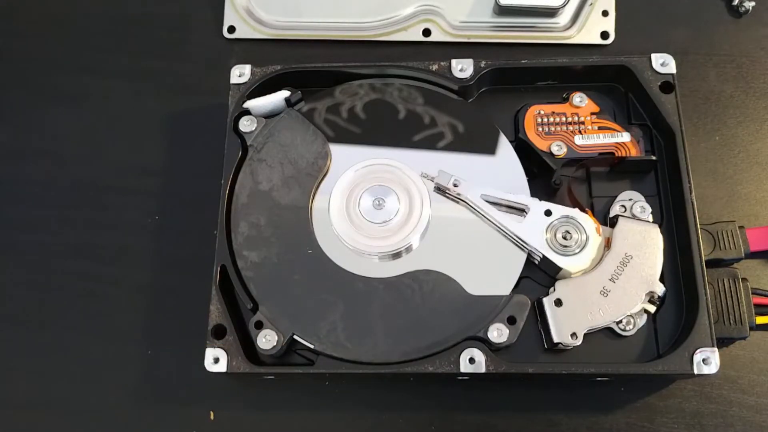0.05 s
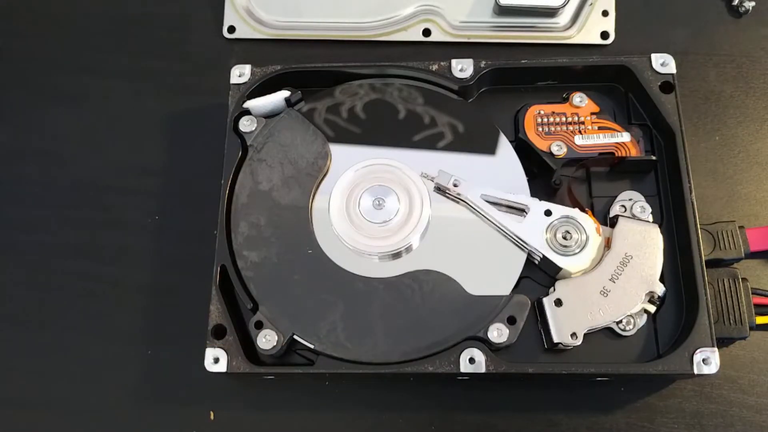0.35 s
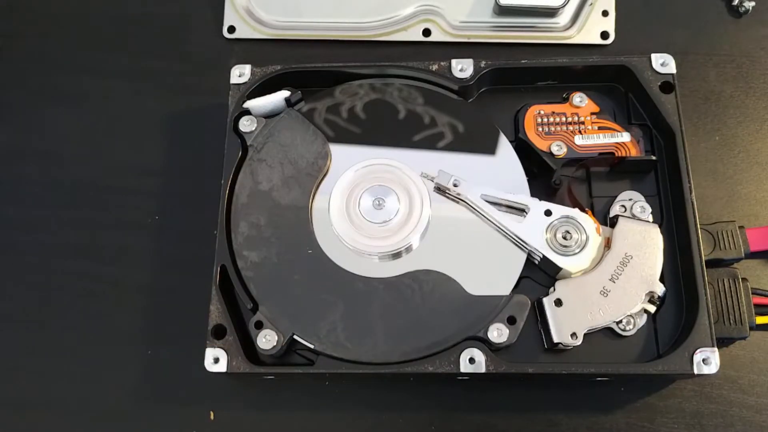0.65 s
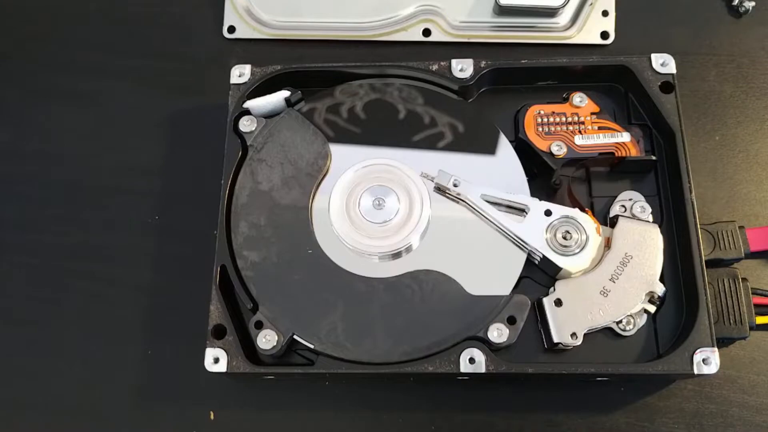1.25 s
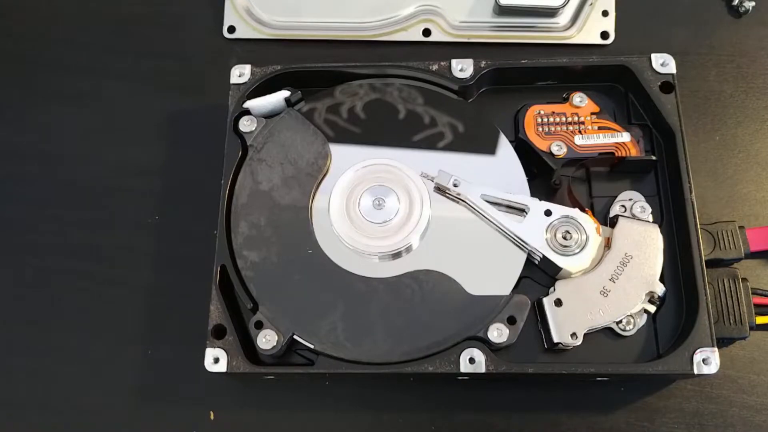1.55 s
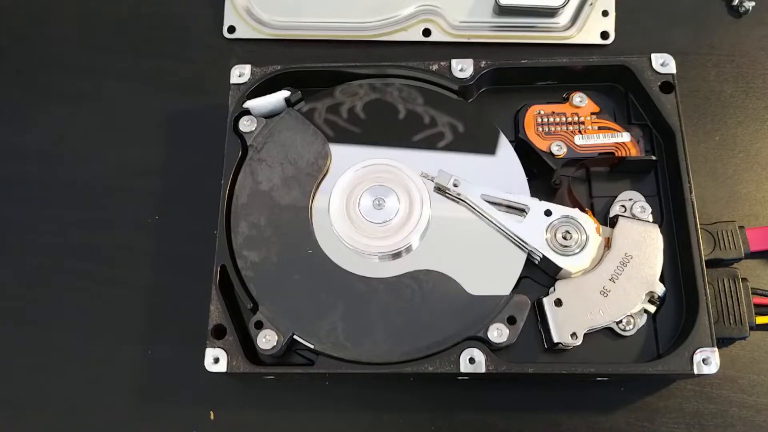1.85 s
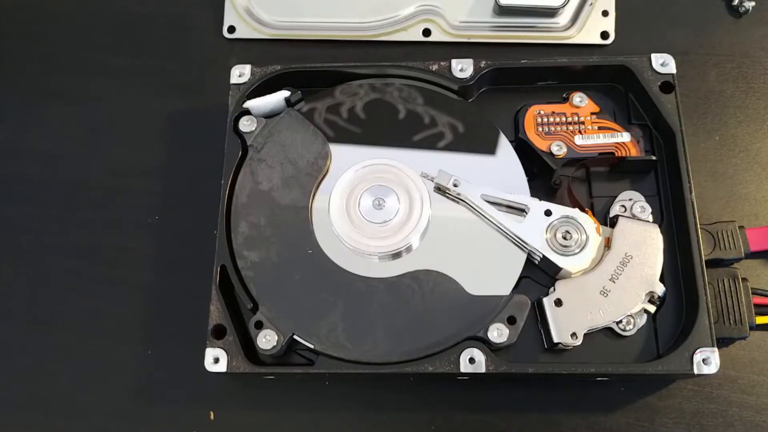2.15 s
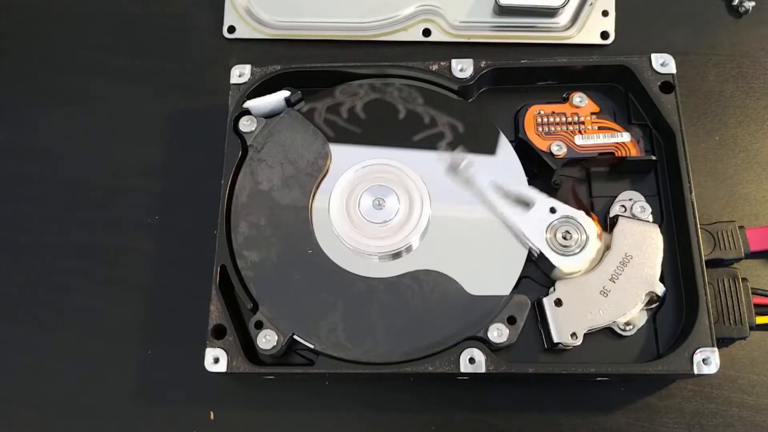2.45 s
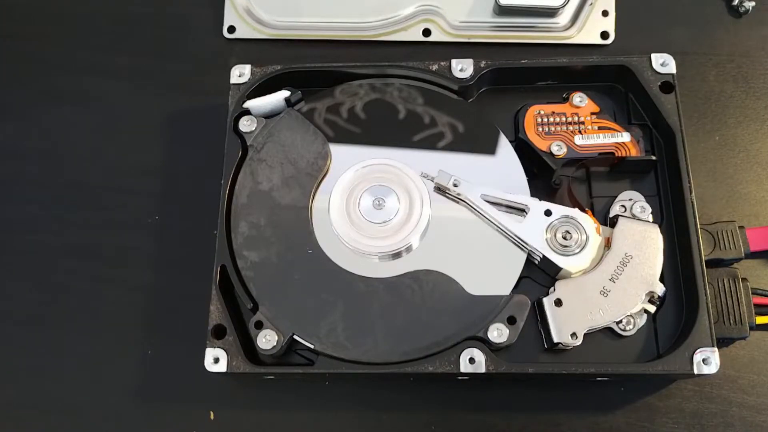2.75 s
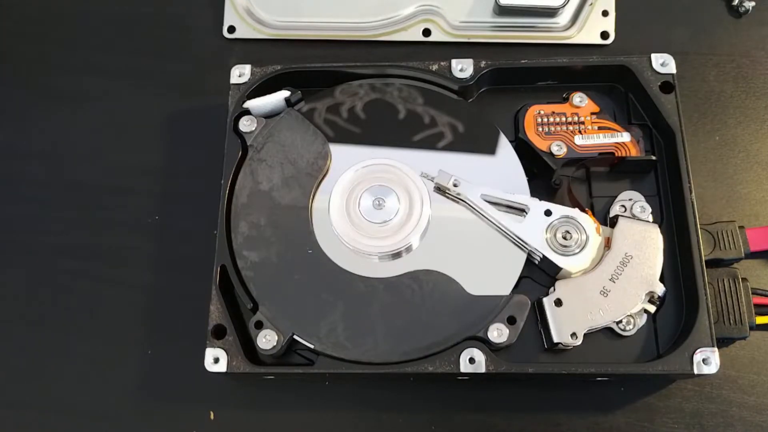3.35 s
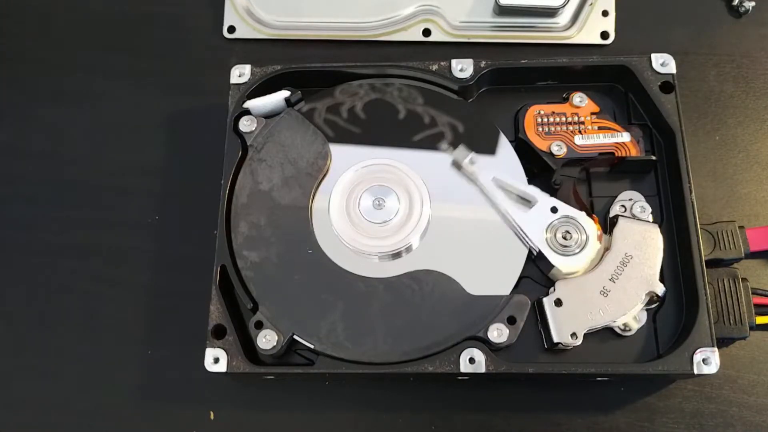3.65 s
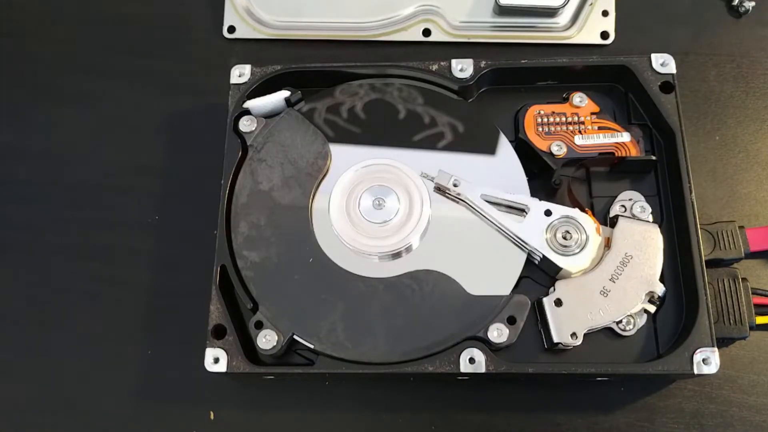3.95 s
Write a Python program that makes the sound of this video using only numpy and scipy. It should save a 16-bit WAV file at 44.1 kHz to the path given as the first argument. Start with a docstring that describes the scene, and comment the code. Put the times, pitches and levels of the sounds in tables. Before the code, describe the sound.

Close up in a small room, an open hard drive's arm makes bright, evenly spaced clicks, each trailed by a soft case thud, then a quick, loud squeak. The spinning platter whirs and hums underneath throughout.

```python
"""Sharp, regular clicks over a steady whir: an open hard disk drive, close up on a desk.
About every 0.64 s the head arm swings out and brakes with a bright tick and a knock, mostly followed
by a settling chirp or two; its return shakes the case with a soft thud. Near the end two fast sweeps
climb through the arm's resonances into a loud squeak. Underneath, the platter drags air, the spindle
hums and rumbles, and a small room adds a short tail."""
import sys
import numpy as np
from scipy import signal
from scipy.fft import rfft, irfft
from scipy.io import wavfile

SR = 44100
rng = np.random.default_rng(int(sys.argv[2]) if len(sys.argv) > 2 else 0)


def pcm_store(signal):
    """Save signal as 16-bit PCM."""
    levels = np.round(np.clip(np.atleast_2d(signal), -1, 1) * 32767)
    wavfile.write(sys.argv[1], SR, levels.astype(np.int16).T)


N = 176400
TIME, FREQ = np.arange(N) / SR, np.fft.rfftfreq(N, 1 / SR)
AROUND = np.arange(-SR // 50, SR // 20) / SR  # seconds before and after an event's peak
BAND_LIMIT_HZ = 16000

# each braking of the arm: time_s, gain_db
BRAKES = [(.5102, 0.5), (1.1510, 0), (1.7917, 0.5), (2.4323, 0.5), (2.9567, 0), (3.5971, .5)]


def knocks():
    """The force of each braking: a few hard cycles and a dying rattle."""
    force = np.zeros(N)
    pitch_hz, rise_s, delay_s = 1624, 0.00098, 0.0026
    for s, db in BRAKES:
        blow = amp(-9) * swell(rise_s, fall_s=0.00055) * buzz(pitch_hz, tilt=1, grit=0.46)
        rattle = amp(-17.5) * swell(rise_s, fall_s=0.0092) * rng.standard_normal(len(AROUND))
        add(force, s + delay_s, amp(db) * (blow + rattle))
    return force


def ticks():
    """The arm's light tip, to the left: a tick and airy snap before each knock, then thin pings."""
    # pings as the arm stops or swings back: time_s, level_db
    pings = [(0.0688, -37), (.5635, -39), (1.214, -35.5), (1.838, -37), (2.520, -36), (3.02, -30),
             (3.7565, -31), (3.8335, -36)]
    force, air = np.zeros(N), np.zeros(N)
    rise_s = 0.00023
    for s, db in BRAKES:
        add(force, s, amp(db - 15) * swell(rise_s, fall_s=0.00047) * buzz(hz=6370, tilt=4, grit=0.9))
        add(air, s, amp(db - 31) * swell(rise_s, fall_s=0.00068) * noise_band(hz=14700, width_hz=1500))
    for s, db in pings:
        add(air, s, amp(db) * swell(rise_s, fall_s=0.0012) * noise_band(hz=11600, width_hz=2400))
    return pan(arm_ring(force), left_db=5.5) + pan(air, left_db=10.5)


def chirps():
    """The force of the arm shuddering as it settles: pitch and level rise and fall together."""
    # settling shudders: time_s, level_db, peak_pitch_hz, rise_s
    shudders = [(.002, -29, 1720, .002), (0.5312, -12, 1770, 0.0029), (1.1673, -16, 1790, 0.0027),
                (1.1823, -14, 1776, .002), (1.8063, -15.5, 1779, 0.0021), (1.8135, -47, 1810, 0.0017),
                (2.977, -13.5, 1793, 0.0026), (3.6133, -15.5, 1780, 0.0021), (3.665, -15.5, 1780, 0.0016)]
    bend_depth, bend_s = 0.1232, 0.0042
    arch = 1 - bend_depth * (1 - np.exp(-(AROUND / bend_s) ** 2))
    force = np.zeros(N)
    for s, db, hz, rise_s in shudders:
        add(force, s, amp(db) * swell(rise_s, fall_s=0.0012) * buzz(hz * arch, tilt=0.88, grit=0.32))
    return force


def sweeps():
    """The force of two fast arm sweeps: a tone gliding up and down over dark, scraping grit."""
    # the path of both sweeps: time_s, pitch_hz, level_db
    glide = [(3.710, 1300, -31), (3.7155, 1622, -14.5), (3.7195, 3235, -26), (3.7215, 4426, -9),
             (3.724, 6005, -18), (3.7275, 4468, -10), (3.7305, 3252, -12.5), (3.735, 1712, -31),
             (3.7425, 1936, -18), (3.745, 3130, -15.5), (3.7472, 4454, -9.5), (3.7488, 5580, -5.5),
             (3.7515, 5570, -11.5), (3.7545, 4706, -11.5), (3.7565, 3080, -11.5), (3.760, 2660, -39),
             (3.767, 1890, -39)]
    s, hz, db = np.transpose(sorted(glide))
    scrape = amp(-9) * unit_rms(cut(rng.standard_normal(N), hz=3500, order=1))
    tone = buzz(np.interp(TIME, s, hz), tilt=1.9, grit=0)
    envelope = amp(np.interp(TIME, s, db)) * (TIME > s[0]) * (TIME < s[-1])
    return envelope * (tone + scrape)


def arm_ring(force):
    """A force rings the arm and chassis; the narrower a resonance, the longer it lasts."""
    # arm and chassis resonances: pitch_hz, width_hz, gain_db
    modes = [(996, 20, -3.5), (1519, 35, -0.5), (1703, 27, -10.5), (1821, 53, 2.5), (2004, 58, 0),
             (2156, 100, -7.5), (2943, 99, -1.5), (3200, 168, 3.5), (3760, 120, -12.5), (4450, 98, 3.5),
             (4614, 80, -13), (5497, 150, 2.5), (6630, 1280, -6), (11350, 450, -0.5)]
    t = TIME[:SR // 5]
    ring = np.zeros(len(t))
    for hz, width_hz, db in modes:
        gain = amp(db) * 2 * np.pi * width_hz / SR
        ring += gain * np.exp(-np.pi * width_hz * t) * np.cos(2 * np.pi * hz * t)
    return signal.fftconvolve(force, ring)[:N]


def arm_body(force):
    """The ringing bulk of the arm: too heavy for high treble, too small to radiate bass."""
    # the arm's stereo lean: frequency_hz, left_minus_right_db
    balance = [(900, 2), (1500, -6), (1800, -4), (3250, -3.5), (5500, -3.5), (6450, 3.5), (11000, -3)]
    # the arm's stereo phase: frequency_hz, left_lead_rad
    phase = [(1200, 2.2), (1800, .5), (2400, 0.9), (3000, 1.6), (3700, 2.86), (4400, 1.1), (5500, 0.5),
             (6400, 1.5), (7100, 1.5)]
    dulled = cut(arm_ring(force), hz=8100, order=3)
    spectrum = rfft(cut(dulled, hz=710, order=2, kind="highpass"))
    return stereo_image(spectrum, spectrum, balance, phase)


def thuds():
    """The arm's return softly rings the low modes of the case, which then shudders briefly."""
    # pushes on the case and desk: start_s, gain_db
    returns = [(.072, -5.5), (.567, 1.5), (1.22, 3), (1.846, 1.5), (2.524, -3.5), (3.027, 0), (3.845, -5.5)]
    # case resonances: pitch_hz, level_db, t60_s
    modes = [(149, -55.5, .2), (201.7, -51.5, 0.15), (264.7, -50, 0.31), (358, -62, 0.19), (460, -50, 0.12),
             (577, -62, 0.11), (725, -50, 0.059), (862, -43, 0.077)]
    rise_s, shudder_delay_s = 0.0032, 0.01791
    out = np.zeros(N)
    for s, db in returns:
        t = np.maximum(TIME - s, 0)
        ring = sum(amp(mode_db - 60 * t / t60) * np.sin(2 * np.pi * (hz * t + rng.random()))
                   for hz, mode_db, t60 in modes)
        out += amp(db) * (1 - np.exp(-t / rise_s)) * ring
        shudder = swell(rise_s=0.014, fall_s=0.014) * noise_band(hz=271, width_hz=153)
        add(out, s + shudder_delay_s, amp(db - 49) * shudder)
    return out


def platter_whir():
    """Air dragged by the platter rushes off it as a steady, wide bed of noise."""
    # tone colour of the rushing air: frequency_hz, density_db
    colour = [(100, -25), (160, -16.5), (240, -16.5), (290, -9), (400, -9), (500, -10.5), (580, -8),
              (720, -10), (850, -6.5), (1050, -8), (1500, -5.5), (1800, -8), (2250, 2.5), (3200, 2.5),
              (4000, -3.5), (4700, 1.5), (7000, 0), (8400, -3.5), (8950, -8), (9600, -5.5), (11000, -6.5),
              (12500, -10), (14300, -14), (15700, -19.5)]
    # how alike the two sides are: frequency_hz, correlation
    likeness = [(200, 0.23), (600, 0.15), (1400, 0.57), (2100, 0.66), (3100, 0.075), (4000, 0.11),
                (5500, 0.33), (6000, 0.25), (6700, 0.43), (7100, 1), (8800, 0.99), (9600, 0.52),
                (15000, 0.83)]
    # the air's stereo lean: frequency_hz, left_minus_right_db
    balance = [(200, -3), (1000, 0), (2600, -2.5), (3200, -1.7), (5000, 0), (6000, -2), (7200, 0.5),
               (8700, -0.5), (9700, 7), (11400, 6.5), (12600, 1)]
    # the air's stereo phase: frequency_hz, left_lead_rad
    phase = [(500, -2.63), (2000, 0.05), (3000, -1.47), (4000, 0.63), (4800, 0.64), (5800, 0)]
    left, unrelated = rfft(rng.standard_normal((2, N))) * amp(curve(colour))
    shared = np.clip(curve(likeness), 0, 1)
    right = shared * left + np.sqrt(1 - shared ** 2) * unrelated
    air = unit_rms(stereo_image(left, right, balance, phase))
    return air * amp(-39.5 + 0.063 * drift(rate_hz=30))


def spindle():
    """The spindle hums at one cycle per turn, with faint, wavering bearing tones."""
    # bearing tones: pitch_hz, level_db
    bearing = [(414.5, -75), (559.9, -66), (624.5, -75.5), (699.8, -72), (834.4, -65), (931.3, -71.5),
               (1104, -68.5), (1244, -72.5), (1497, -67.5)]
    turn_hz = 120.4
    hum = amp(-45.5) * unit_rms(np.sin(2 * np.pi * turn_hz * TIME + 0.02 * drift(rate_hz=3)))
    tones = sum(amp(db) * unit_rms(np.sin(2 * np.pi * hz * TIME + 1.8 * drift(rate_hz=6.4)))
                for hz, db in bearing)
    return pan(hum + tones, left_db=-0.4)


def rumble():
    """A low rumble under the spindle, nearly centred, that swells near the end."""
    # tone colour of the rumble: frequency_hz, density_db
    colour = [(10, -18), (22, -9), (31, 1.5), (41, -9), (56, -4.5), (72, -17), (110, -7.5), (200, -24),
              (400, -58)]
    # its swell: time_s, level_db
    levels = [(0, -58.5), (3.4, -57), (3.8, -50.5), (4, -54.5)]
    width = 0.28
    mid, side = irfft(rfft(rng.standard_normal((2, N))) * amp(curve(colour)), N)
    bed = unit_rms(np.array([mid + width * side, mid - width * side]))
    return bed * amp(np.interp(TIME, *np.transpose(levels)))


def desk_scatter(x):
    """Dense reflections off the open case and the desk in the first milliseconds."""
    t = TIME[:SR // 25]
    gap_s, fall_s = 0.001, 0.0043
    taps = rng.standard_normal((2, len(t))) * np.exp(-t / fall_s) * (t > gap_s)
    return signal.fftconvolve(x, taps / np.linalg.norm(taps[0]), axes=1)[:, :N]


def room(x):
    """A small room: a diffuse tail whose treble dies first."""
    # the room's decay: frequency_hz, t60_s
    decay = [(300, 0.62), (1800, 0.22), (5000, 0.13), (14000, 0.077)]
    hz, t, noise = signal.stft(rng.standard_normal((2, SR // 2)), SR, nperseg=256)
    tail = signal.istft(noise * amp(-60 * t / curve(decay, hz)[:, None]), SR, nperseg=256)[1]
    tail *= np.minimum(TIME[:tail.shape[1]] / 0.013, 1)  # 13 ms fade-in
    return signal.fftconvolve(x, tail / np.linalg.norm(tail[0]), axes=1)[:, :N]


def buzz(hz, tilt, grit):
    """The force on the moving arm: harmonics of a pitch that follows its speed, plus grit."""
    if np.isscalar(hz):
        hz = np.full(len(AROUND), hz)
    angle = 2 * np.pi * np.cumsum(hz) / SR
    tone = sum(np.cos(k * angle) / k ** tilt * (k * hz < BAND_LIMIT_HZ) for k in range(1, 9))
    return tone + grit * rng.standard_normal(len(hz))


def noise_band(hz, width_hz):
    """A short stretch of noise in one resonance."""
    n = len(AROUND)
    detune = 2 * (np.fft.rfftfreq(n, 1 / SR) - hz) / width_hz
    return unit_rms(irfft(rfft(rng.standard_normal(n)) / (1 + detune ** 2), n))


def swell(rise_s, fall_s):
    """An exponential rise to a peak and fall from it."""
    return np.exp(-np.maximum(-AROUND / rise_s, AROUND / fall_s))


def drift(rate_hz):
    """A smooth random wander of rms 1."""
    return unit_rms(irfft(rfft(rng.standard_normal(N)) / (1 + (FREQ / rate_hz) ** 4), N))


def add(mix, s, sound):
    """Mixes in a sound laid out around the moment s."""
    at = round((s + AROUND[0]) * SR) + np.arange(len(sound))
    inside = (at >= 0) & (at < N)
    mix[at[inside]] += sound[inside]


def pan(x, left_db):
    """Places a sound left_db louder on the left than on the right."""
    return np.array([x * amp(left_db / 2), x * amp(-left_db / 2)])


def stereo_image(left, right, balance, phase):
    """Turns two spectra into stereo sound with a level and phase difference between the sides."""
    lean = amp(curve(balance) / 2) * np.exp(0.5j * curve(phase))
    return irfft(np.array([left * lean, right / lean]), N)


def cut(x, hz, order, kind="lowpass"):
    """Rolls off the treble or, as a high-pass, the bass."""
    return signal.sosfilt(signal.butter(order, hz, kind, fs=SR, output="sos"), x)


def curve(points, hz=FREQ):
    """Joins a table's points along a log-frequency axis."""
    point_hz, value = np.transpose(points)
    return np.interp(np.log(hz + 1), np.log(point_hz + 1), value)


def amp(db):
    """Decibels to gain."""
    return 10 ** (np.asarray(db) / 20)


def unit_rms(x):
    """Scales to rms 1."""
    return x / np.sqrt(np.mean(x ** 2) + 1e-20)


def scene():
    """The arm and its reflections up front; thuds, hum, rumble and whir behind."""
    arm = arm_body(knocks() + chirps() + sweeps()) + ticks()
    reflections = amp(-9) * desk_scatter(arm) + amp(-13) * room(arm)
    return arm + reflections + thuds() + spindle() + rumble() + platter_whir()


def record(dry):
    """A steep low-pass trims the very top of the treble."""
    lowpass = signal.firwin(255, BAND_LIMIT_HZ, window=("kaiser", 9), fs=SR)
    return signal.oaconvolve(dry, lowpass[None], "same")


dry = scene()
out = record(dry)
pcm_store(out)
```